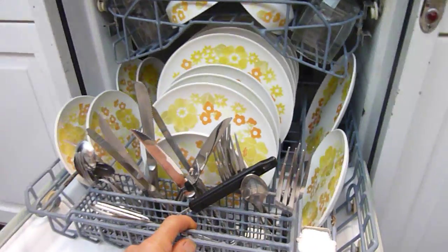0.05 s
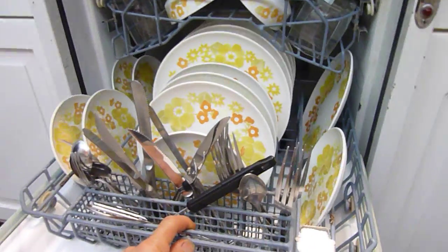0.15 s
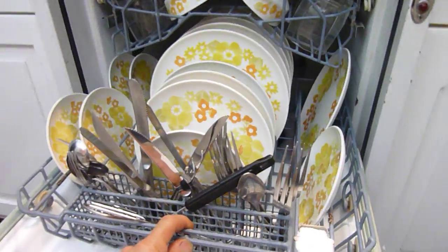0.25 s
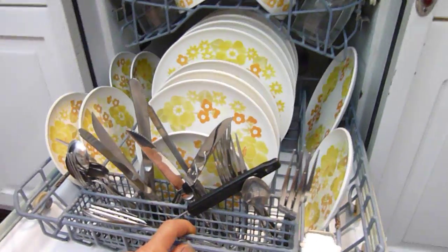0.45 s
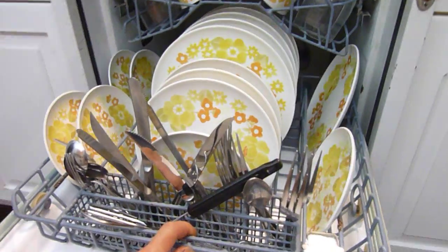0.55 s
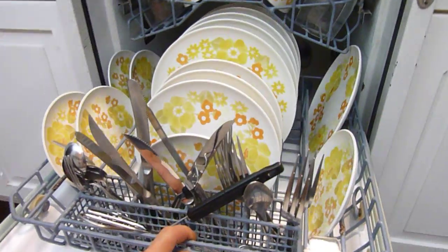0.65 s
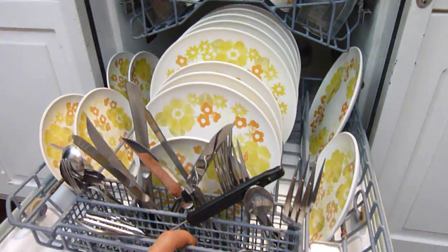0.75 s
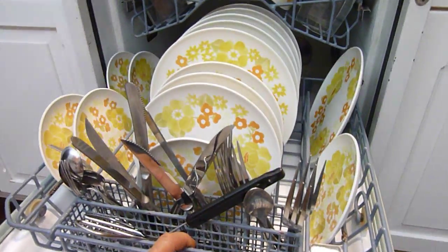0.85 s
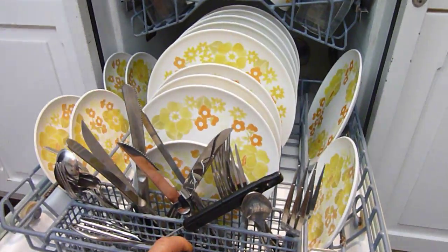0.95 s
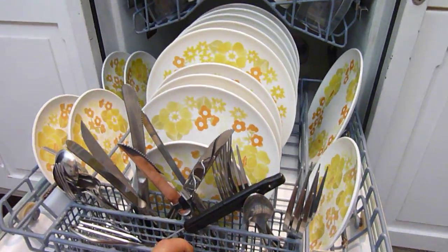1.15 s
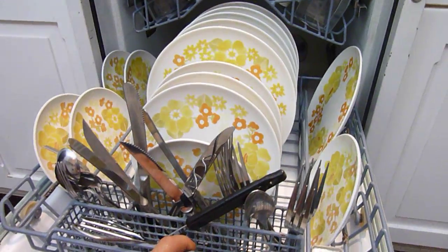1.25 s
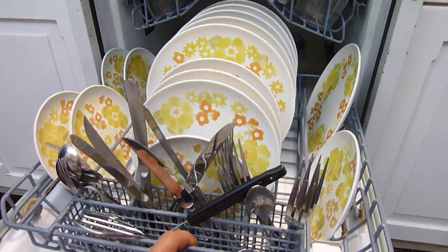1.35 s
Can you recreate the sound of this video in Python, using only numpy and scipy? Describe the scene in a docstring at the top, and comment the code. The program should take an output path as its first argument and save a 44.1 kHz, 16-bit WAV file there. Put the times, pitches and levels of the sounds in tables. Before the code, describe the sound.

Dishwasher rack rumbling on its wheels, with clinking cutlery and clattering china plates.

```python
"""Wheels rumble and cutlery ticks as a loaded dishwasher rack is pulled out, close up in a kitchen.
Each bump thuds, rings the rack and shakes the steel cutlery in its basket into bright clinks.
The door booms softly under the weight, and the china plates clatter together just before
the rack knocks to a halt. Quiet room tone and short reflections sit behind it all."""
import sys
import numpy as np
from scipy import signal
from scipy.fft import rfft, irfft
from scipy.io import wavfile

SR = 44100
rng = np.random.default_rng(int(sys.argv[2]) if len(sys.argv) > 2 else 0)


def materialize(psi):
    """Save the field psi as 16-bit PCM at rate SR to the path in sys.argv[1].

    A 1-D psi becomes a single channel; in a 2-D psi each row is a channel.
    """
    bounded = np.clip(np.atleast_2d(psi).T, -1, 1)
    quanta = np.round(bounded * 32767).astype(np.int16)
    wavfile.write(sys.argv[1], SR, quanta)


N = 61739
T = np.arange(SR // 2) / SR  # time axis of one hit, s

# room tone spectrum: f/Hz, level/dB
AIR_COLOUR = [(25, -41), (60, -23), (110, -2.5), (170, -3.5), (380, 6.5), (800, 14.5), (1600, 0.5),
              (4000, -5), (7400, -15)]
# tone of the reflections: f/Hz, level/dB
ROOM_COLOUR = [(100, -1), (350, -2), (800, 1), (3000, -1.5), (8000, -0.5)]
# reverb time: f/Hz, t60/s
ROOM_T60 = [(150, 0.59), (500, 0.39), (1500, 0.44), (4000, 0.3), (8000, 0.23)]
# stereo width of the reflections: f/Hz, side over mid
ROOM_WIDTH = [(100, .08), (300, .08), (700, 0.2), (1500, 0.49), (4000, 0.67), (8000, 0.59)]
# boom of the door: t/s, level/dB
DOOR_HITS = [(.762, -51)]
# its spectrum: f/Hz, level/dB
DOOR_COLOUR = [(40, -19), (90, -1), (150, -1), (230, 1), (400, -16.5), (1500, -55.5)]
# rolling envelope: t/s, level/dB
ROLL_LEVEL = [(0, -36), (.07, -34), (.27, -33), (.38, -38), (.46, -28.5), (.58, -43), (.69, -31),
              (.8, -29.5), (.93, -37.5), (1.05, -41), (1.14, -45), (1.22, -47.5), (1.4, -43.5)]
# wheel noise through the wire rack: f/Hz, level/dB
ROLL_COLOUR = [(30, -33.5), (90, -18.5), (165, -6.5), (220, -6), (380, 5), (550, -0.5), (680, -4),
               (1000, -5), (2000, -14), (4000, -22), (7400, -34)]
# wheel bumps and the end stop: t/s, level/dB, knock level/dB, thud f/Hz
BUMPS = [(0.062, -37, 0, 547), (.108, -37.5, -6.5, 492), (0.122, -42, -4, 463), (0.192, -32.5, -15, 319),
         (0.216, -27.5, -15.5, 355), (.229, -24, -26.5, 392), (.247, -46.5, -15, 396),
         (.2635, -33.5, -2.5, 530), (.27, -23.5, -8, 378), (0.286, -34, -6.5, 384), (0.328, -32, -14, 415),
         (0.406, -41.5, 7.5, 501), (0.4337, -22.5, -10, 410), (.447, -33, -17.5, 378), (.459, -27, -4, 414),
         (.504, -41.5, -12, 435), (0.597, -29.5, -3, 602), (.611, -33, 0, 250), (0.66, -23, -23, 396),
         (.694, -20, -10, 380), (0.711, -19.5, -11, 358.8), (.738, -32, -5, 323), (0.7636, -21, -12.5, 363),
         (0.779, -22.5, -3.5, 345.5), (0.9568, -20.5, -3, 384.4), (1.021, -24.5, 1.5, 522),
         (1.03, -31, 0.5, 490), (1.049, -35.5, -13, 504), (1.125, -32.5, -20, 420), (1.188, -40, -20, 388)]
# modes of the rack and door: f/Hz, level/dB, t60/s
RACK_MODES = [(218.4, -16.5, 0.17), (331.9, 0, 0.2), (379, 1.5, 0.079), (427.4, 3.5, .07),
              (491.8, -3, 0.11), (564.7, -13, 0.32), (914, -18, 0.16), (964, -23.5, 0.19)]
# hard plastic-on-metal edge of a bump: f/Hz, level/dB
KNOCK_COLOUR = [(60, -43.5), (160, -40), (300, -1.5), (550, 6.5), (720, 2.5), (1000, 7.5), (1400, -6),
                (1900, -3.5), (2500, -18.5), (7000, -29.5)]
# plates knocking together: t/s, level/dB
PLATE_HITS = [(0.256, -34.5), (0.298, -36), (0.467, -36), (.696, -29.5), (0.72, -50), (0.754, -30),
              (0.782, -29), (0.807, -30.5), (.83, -27.5), (.839, -24), (.854, -33), (0.871, -28.5),
              (0.886, -29.5), (0.899, -26.5), (0.92, -42), (0.942, -40.5)]
# modes of the plates: f/Hz, level/dB
PLATE_MODES = [(908, 2), (968, 0), (1130, -12), (1290, -10.5), (1362, 4.5), (1490, -5.5), (1620, -0.5),
               (2535, 3), (2925, -6.5), (3340, -10.5), (3443, -5.5), (3716, 4.5), (3916, -4.5),
               (4193, -0.5), (4344, -9.5), (6710, -4.5)]
# contact of china on china: f/Hz, level/dB
CLACK_COLOUR = [(90, -44), (250, -23), (600, -1.5), (1000, 9.5), (1550, 9.5), (2100, -12), (4000, -1.5),
                (7400, -49)]
# envelope of the fine jingling: t/s, level/dB
JINGLE_LEVEL = [(0, -49.5), (.15, -43), (.29, -50), (.39, -62.5), (.48, -45.5), (.6, -48), (.72, -39),
                (.84, -30.5), (.92, -32.5), (1, -52), (1.15, -53), (1.4, -86)]
# dense partials of knives, forks and spoons: f/Hz, level/dB
STEEL_COLOUR = [(90, -40.5), (300, -22), (800, -10.5), (1400, -4.5), (2000, -2), (2500, 1.5), (3700, 3),
                (4900, -3), (6000, -3), (7300, -7)]
# cutlery strikes: t/s, level/dB, tone f/Hz, tone level/dB, treble tilt/(dB per octave)
CLINKS = [(.012, -32, 3870, -7.5, -8.5), (0.203, -46, 5790, 3, 14), (.219, -42, 2305, 1.5, -2),
          (0.2527, -31.5, 3738, -13, -0.5), (.261, -31.5, 3530, -12, -3.5), (0.2707, -34.5, 4140, -1.5, -1),
          (0.28, -36, 5180, -2, -1.5), (.296, -37, 2340, 0.5, 8), (0.2913, -31.5, 7200, -10.5, 8),
          (0.324, -33, 6930, -14, 4.5), (.327, -30.5, 4030, -6, 3), (0.402, -43, 2473, -3, 3),
          (0.4361, -38, 4080, -4, -2), (0.46, -25, 3540, -10, 6), (.464, -35.5, 5050, -2.5, 0),
          (0.4617, -39, 6800, -5, -4), (0.48, -40, 3980, 1, 7), (.514, -44, 5800, -8, -10.5),
          (0.5345, -37.5, 2590, -1.5, -4), (.537, -43.5, 2970, 1, 0), (.541, -45, 3312, 5.5, -13.5),
          (0.629, -44, 4180, 3, -1), (0.66, -46.5, 2492, 5, 9.5), (0.6715, -37.5, 4300, -3, 3),
          (.684, -30, 3700, -7, -27), (0.696, -36, 4452, -2.5, -5.5), (0.7015, -30.5, 5150, -5.5, 0),
          (.706, -31.5, 2367, 2.5, 4.5), (.741, -32, 3340, -1.5, 12.5), (0.748, -32, 4230, 1, 4),
          (0.7799, -25, 4060, -16.5, -1), (0.7907, -29, 3990, -1, 1), (.805, -19, 6686, -12, 5),
          (.8126, -28.5, 4316, 4.5, -15), (.822, -27, 3010, 0, -7.5), (.826, -5.5, 4164, -15.5, 10.5),
          (.83, -19, 3410, -4, 4), (0.834, -28.5, 3550, -0.5, -5), (.841, -21, 3634, -8, 6.5),
          (.862, -34.5, 3750, -28.5, 16), (0.885, -20, 5990, -22, 7), (0.8967, -28, 4360, -4, 4),
          (.907, -36, 4330, -1, -0.5), (.93, -27.5, 7290, -12, 0), (.936, -45.5, 3660, 10.5, -8),
          (0.964, -33.5, 3430, -21, -3), (1.028, -39.5, 6700, -11.5, 0), (1.0874, -50.5, 2970, 1.5, -1),
          (1.1261, -48, 3660, 0.5, 0), (1.1843, -58, 2410, 3, -2), (1.2236, -56.5, 3664, 9, 0),
          (1.232, -58.5, 2365, 7, -4)]
# overall tone, with thinned bass, a steep cut near 7.5 kHz and a faint band at 8.5 kHz: f/Hz, level/dB
TONE_CURVE = [(25, -24), (50, -30), (90, -7), (125, -10), (162, -18.5), (205, -6), (290, -8), (7200, -0.5),
              (7550, -7.5), (7830, -22), (8050, -49.5), (8250, -32.5), (8500, -17), (8850, -30)]


def amp(db):
    """Decibels to gain."""
    return 10 ** (np.asarray(db) / 20)


def read(points, hz):
    """A curve read on a log-frequency axis."""
    f, value = np.transpose(points)
    return np.interp(np.log(hz + 1), np.log(f + 1), value)


def envelope(points):
    """Fader ride from rows of t/s, level/dB."""
    return amp(np.interp(np.arange(N) / SR, *np.transpose(points)))


def unit_rms(x):
    """Scales to rms 1."""
    return x / np.sqrt(np.mean(x ** 2) + 1e-20)


def unit_hit(x):
    """Scales a hit to the energy of 20 ms at rms 1."""
    return x / np.sqrt(np.sum(x ** 2) / (.02 * SR) + 1e-20)


def colour(x, points, tilt_db=0):
    """EQ curve, with a tilt per octave above 1 kHz."""
    hz = np.fft.rfftfreq(x.shape[-1], 1 / SR)
    octaves = np.log2(np.maximum(hz, 1000) / 1000)
    return irfft(rfft(x) * amp(read(points, hz) + tilt_db * octaves), x.shape[-1])


def add(mix, s, sound, pan=0):
    """Places a sound in the stereo mix at s seconds."""
    part = mix[:, max(round(s * SR), 0):][:, :len(sound)]
    part += np.array([[1 - pan], [1 + pan]]) * sound[:part.shape[1]]


def fade(t60):
    """Exponential decay, 60 dB down after t60 seconds."""
    return amp(-60 * T / t60)


def mode(hz, db, t60):
    """One decaying partial with a random phase."""
    return amp(db) * fade(t60) * np.sin(2 * np.pi * (hz * T + rng.random()))


def burst(points, t60, tilt_db=0):
    """Countless partials struck at once: a short ring of coloured noise."""
    partials = colour(rng.choice([-1., 1.], len(T)), points, tilt_db)
    return unit_hit(partials * fade(t60))


def grains(per_s, spread_db):
    """Random tiny impacts of uneven size."""
    sizes = rng.choice([-1., 1.], N) * amp(spread_db * np.minimum(rng.exponential(1, N), 3))
    return sizes * (rng.random(N) < per_s / SR)


def room_tone(width=0.89):
    """A steady, wide bed of kitchen air."""
    mid, side = unit_rms(colour(rng.standard_normal((2, N)), AIR_COLOUR))
    return mid + width * np.array([side, -side])


def reflections(x, per_s=3000, predelay_s=0.0053):
    """Echoes off the tub and cupboards, narrow in the bass and wider above."""
    shape = (2, len(T))
    taps = rng.choice([-1., 1.], shape) * (rng.random(shape) < per_s / SR) * (T > predelay_s)
    hz, t, bands = signal.stft(taps, SR, nperseg=256)
    bands *= amp(read(ROOM_COLOUR, hz)[:, None] - 60 * t / read(ROOM_T60, hz)[:, None])
    bands[1] *= read(ROOM_WIDTH, hz)[:, None]
    mid, side = signal.istft(bands, SR, nperseg=256)[1]
    response = np.array([mid + side, mid - side]) / np.linalg.norm(mid)
    return signal.fftconvolve(x.mean(0)[None], response, axes=1)[:, :N]


def door(rise_s=0.0022):
    """The door booms low under the weight of the rack."""
    out = np.zeros((2, N))
    attack = 1 - np.exp(-T / rise_s)
    for s, db in DOOR_HITS:
        add(out, s, amp(db) * unit_hit(attack * burst(DOOR_COLOUR, t60=0.15)))
    return out


def wheels():
    """Plastic wheels grind over the track and shake the rack."""
    grit = grains(per_s=900, spread_db=2)
    return envelope(ROLL_LEVEL) * unit_rms(colour(grit, ROLL_COLOUR))


def bumps(rise_s=0.0022, thud_db=7):
    """Each jolt thuds, rings the rack and knocks plastic on metal."""
    out = np.zeros((2, N))
    attack = 1 - np.exp(-T / rise_s)
    for s, db, knock_db, thud_hz in BUMPS:
        cycles = T * thud_hz
        thud = amp(thud_db) * np.sin(2 * np.pi * cycles) * cycles * np.exp(1 - cycles)
        ring = sum(mode(*row) for row in RACK_MODES)
        body = unit_hit(thud + attack * ring)
        knock = unit_hit(attack * burst(KNOCK_COLOUR, t60=0.08))
        add(out, s, amp(db) * (amp(knock_db) * knock - body))
    return out


def plates(t60_at_1khz=0.19, damping=0.41, clack_db=0.5, pan_spread=.04):
    """China clacks: each contact rings the modes in its own mix, and the high ones die sooner."""
    out = np.zeros((2, N))
    for s, db in PLATE_HITS:
        ring = sum(mode(hz, mode_db + rng.normal(), t60_at_1khz * (1000 / hz) ** damping)
                   for hz, mode_db in PLATE_MODES)
        clack = amp(clack_db) * burst(CLACK_COLOUR, t60=0.11)
        add(out, s, amp(db) * (unit_hit(ring) + clack), pan_spread * rng.normal())
    return out


def cutlery_jingle(pieces=6, touches_per_s=400, pan_spread=.04):
    """Light touches in the basket blur into a shimmer, each piece with its own ring."""
    out = np.zeros((2, N))
    for _ in range(pieces):
        touches = grains(touches_per_s / pieces, spread_db=3)
        ring = burst(STEEL_COLOUR, t60=0.035, tilt_db=-1.3)
        shimmer = unit_rms(signal.fftconvolve(touches, ring)[:N])
        add(out, 0, shimmer, pan_spread * rng.normal())
    return envelope(JINGLE_LEVEL) * out / np.sqrt(pieces)


def clink_tone(hz, width_hz=100, neighbours_db=2):
    """The leading tone of struck steel, with close, quickly beating neighbours."""
    f = np.fft.rfftfreq(len(T), 1 / SR)
    phases = np.exp(2j * np.pi * rng.random(len(f)))
    neighbours = unit_rms(irfft(phases / (1 + ((f - hz) / width_hz) ** 2), len(T)))
    tone = np.sin(2 * np.pi * hz * T) + amp(neighbours_db) * neighbours
    return unit_hit(tone * fade(t60=0.055))


def cutlery_clinks(pan_spread=.04):
    """Steel strikes steel: one leading tone over a splash of dense partials."""
    out = np.zeros((2, N))
    for s, db, hz, tone_db, tilt_db in CLINKS:
        splash = burst(STEEL_COLOUR, t60=0.071, tilt_db=tilt_db)
        clink = splash + amp(tone_db) * clink_tone(hz)
        add(out, s, amp(db) * clink, pan_spread * rng.normal())
    return out


def scene(reverb_db=-5, air_db=-48):
    """The rack and its load up front, the kitchen behind."""
    near = door() + wheels() + bumps() + plates() + cutlery_jingle() + cutlery_clinks()
    return near + amp(reverb_db) * reflections(near) + amp(air_db) * room_tone()


def record(dry, left_db=-0.73, cutoff_hz=8936):
    """The overall tone curve, a slight lean to the right and a steep low-pass."""
    padded = np.pad(dry, ((0, 0), (0, len(T))))
    heard = colour(padded, TONE_CURVE)[:, :N] * amp([[left_db], [0]])
    lowpass = signal.firwin(511, cutoff_hz, window=("kaiser", 9), fs=SR)
    return signal.oaconvolve(heard, lowpass[None], "same")


dry = scene()
out = record(dry)
materialize(out)
```